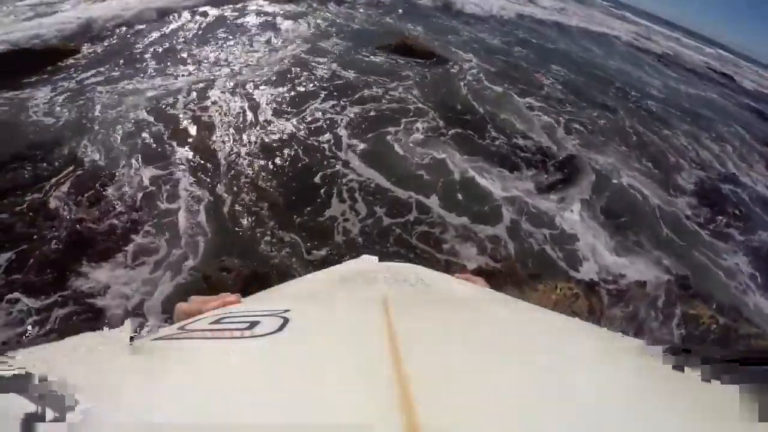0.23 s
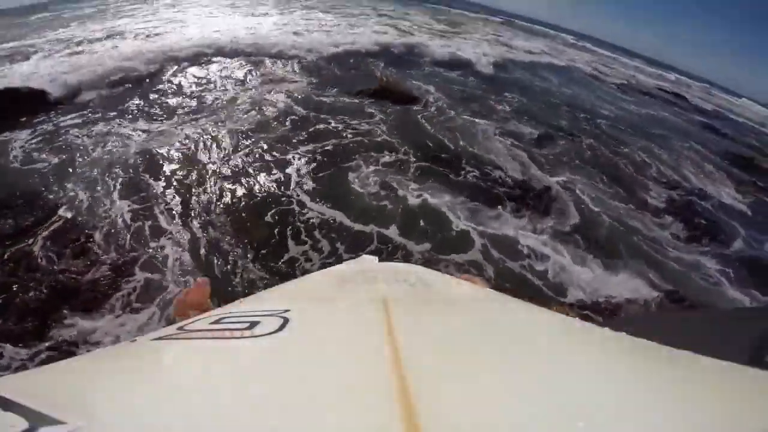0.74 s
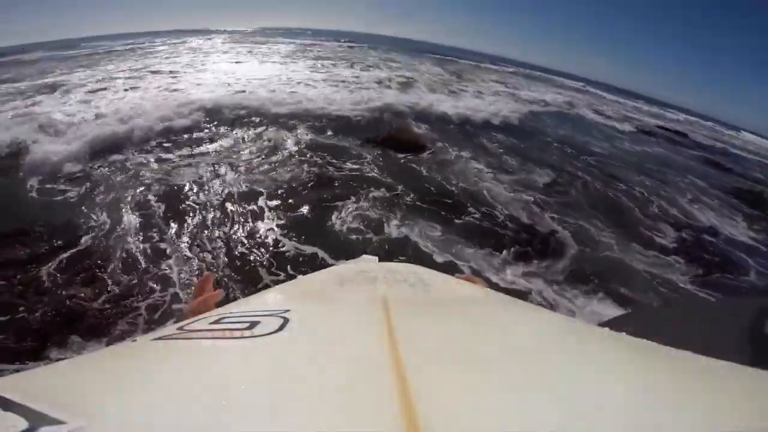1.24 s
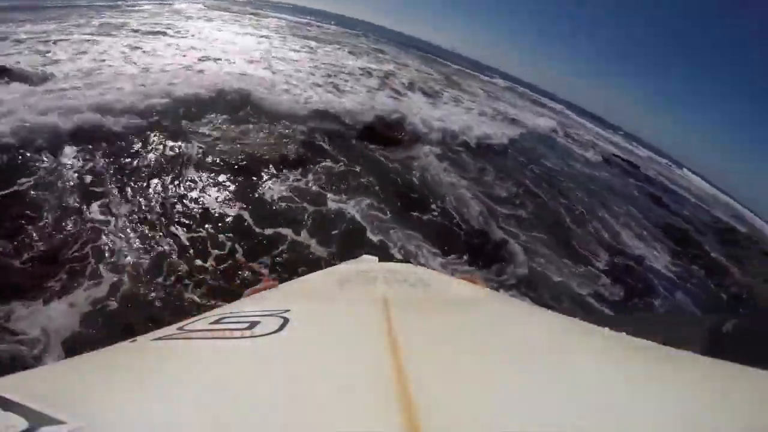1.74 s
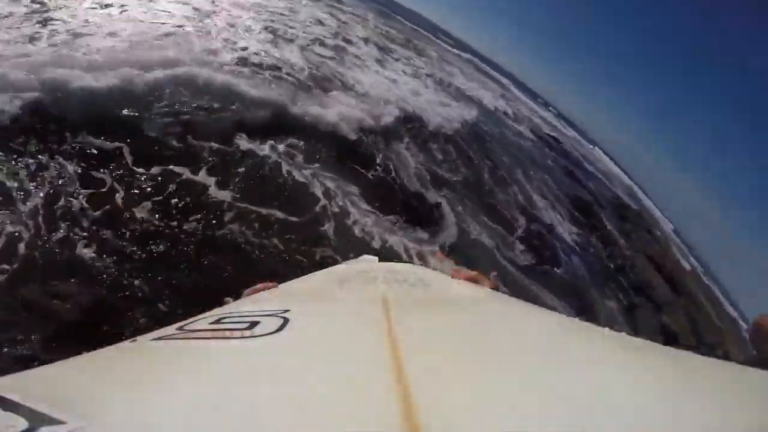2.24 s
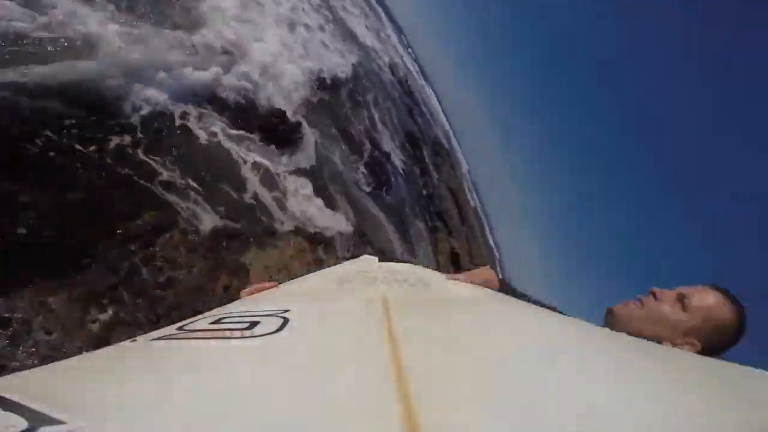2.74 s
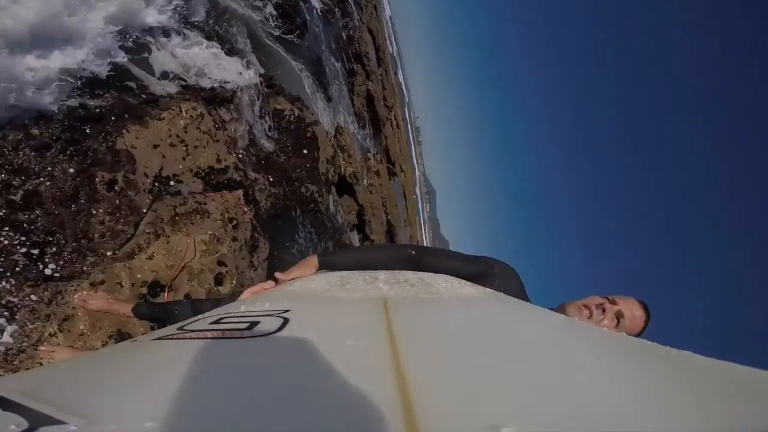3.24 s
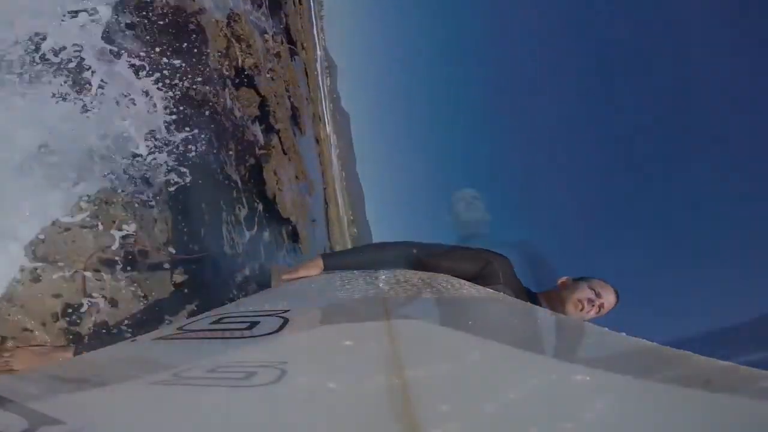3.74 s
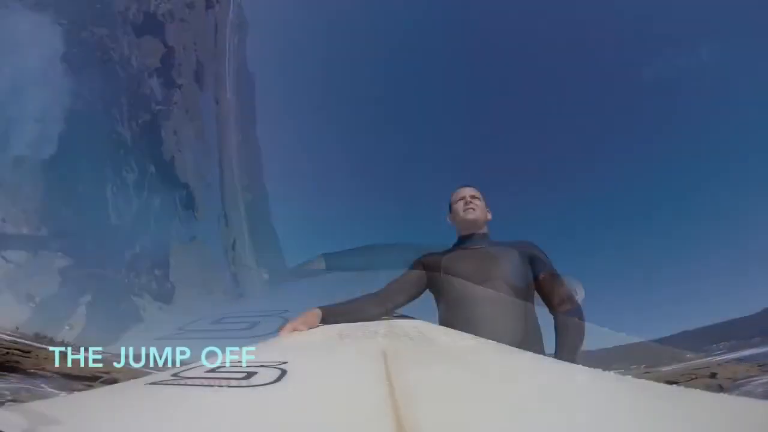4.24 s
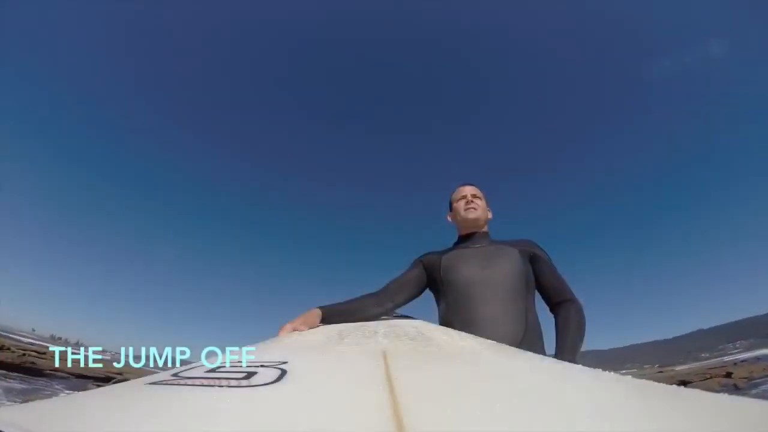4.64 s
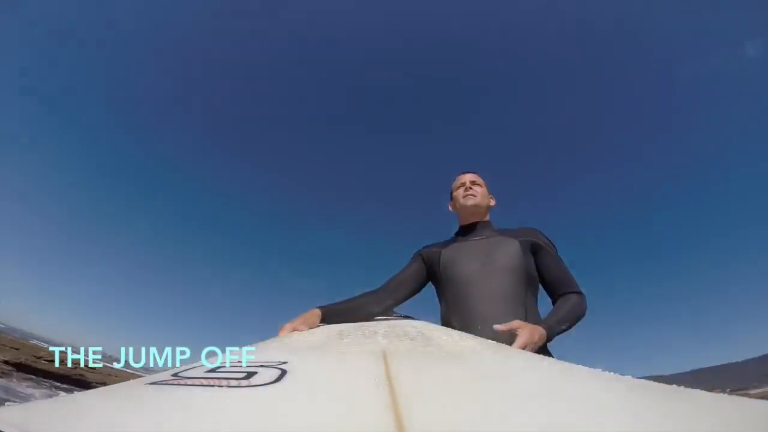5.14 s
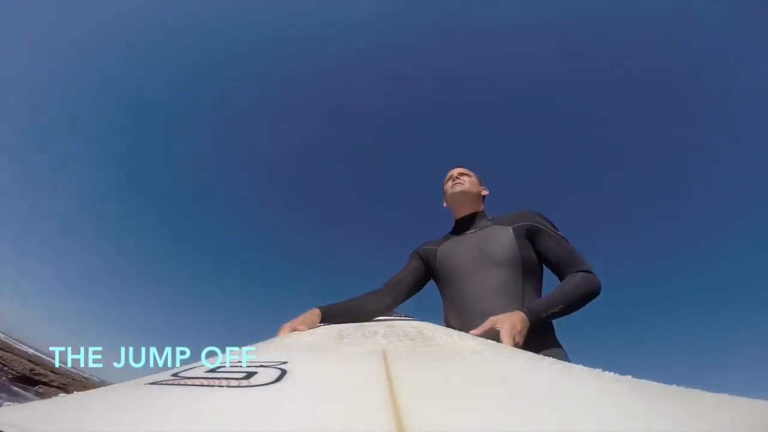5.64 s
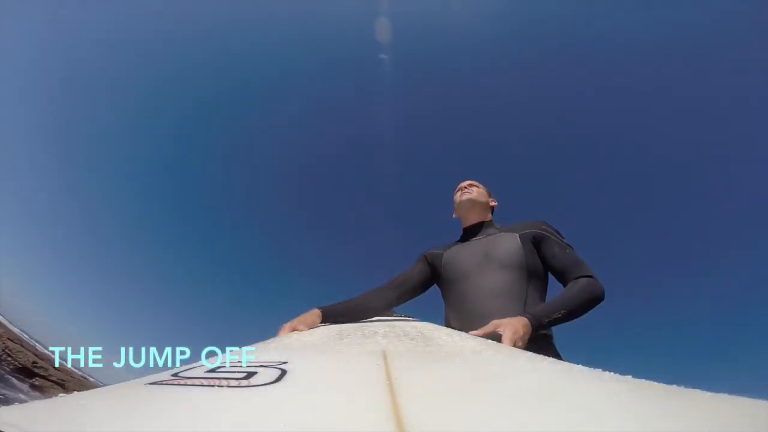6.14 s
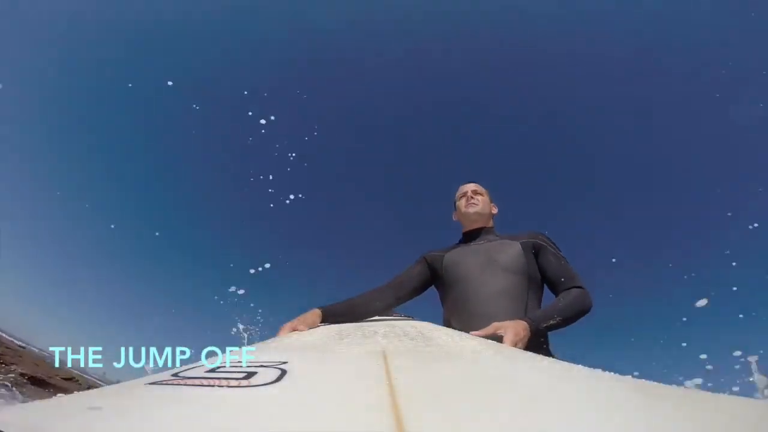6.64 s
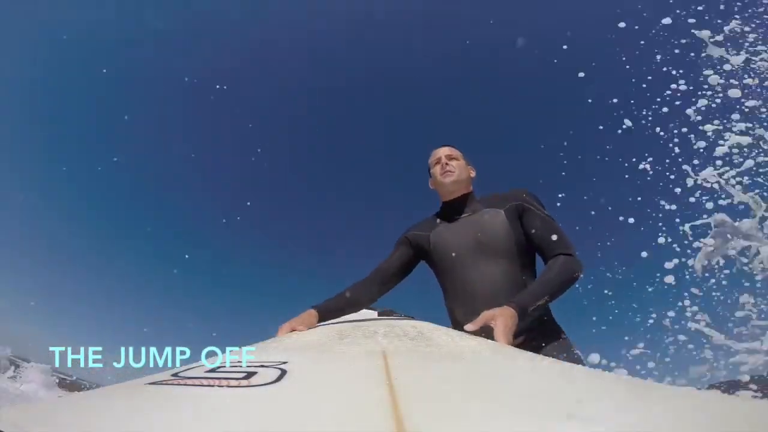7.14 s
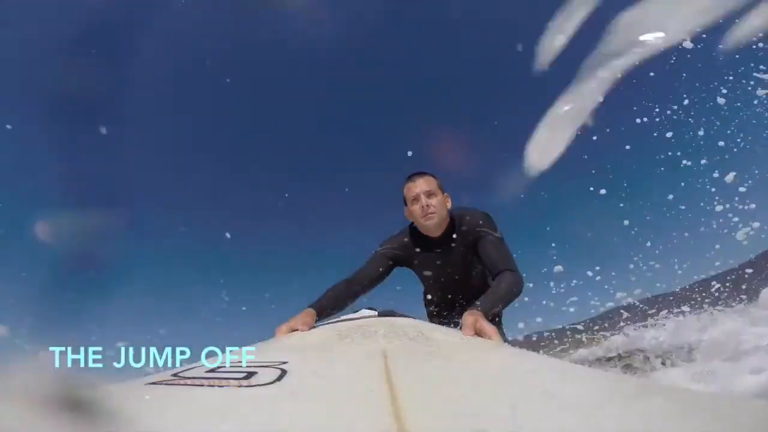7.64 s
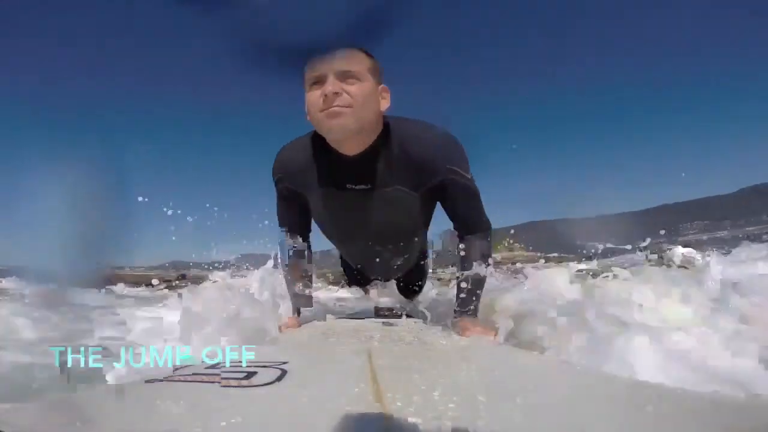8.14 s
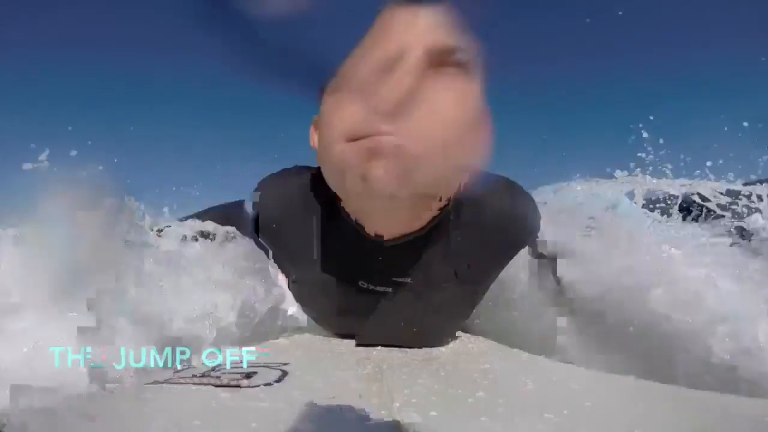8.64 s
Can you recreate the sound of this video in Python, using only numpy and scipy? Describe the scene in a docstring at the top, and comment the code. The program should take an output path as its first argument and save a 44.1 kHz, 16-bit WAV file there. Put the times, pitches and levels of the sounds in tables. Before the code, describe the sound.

Muffled knocks, deep board booms and wet squeaks over hissing surf, then a quieter stretch before waves splash, spatter and slap under the hull.

```python
"""On a rocky shore, a surfboard is carried into whitewater, heard from a sealed camera on its nose.
From the start surf hisses all around, as noise and bursting bubbles through the housing's resonances.
Hands and feet at arm's length jolt, knock, rub, squeak and skid; the board booms and rings as gliding tones.
After a cut to a second, quieter shot with the nose pointing up, the surf sings faintly. A wave bursts alongside:
spray crackles, drops spatter, a film of water dulls the treble; water slaps and bubbles under the booming hull."""
import sys
import numpy as np
from scipy import signal
from scipy.fft import rfft, irfft, next_fast_len
from scipy.io import wavfile
from scipy.ndimage import map_coordinates

SR = 44100
rng = np.random.default_rng(int(sys.argv[2]) if len(sys.argv) > 2 else 0)


def waveform_to_disk(signal):
    """Save audio, clipped to [-1, 1], as 16-bit WAV at the path in sys.argv[1]."""
    frames = np.transpose(np.atleast_2d(signal))
    scaled = np.clip(frames, -1, 1) * 32767
    samples = np.round(scaled).astype(np.int16)
    wavfile.write(sys.argv[1], SR, samples)


N = 392931
T = np.arange(N) / SR

# envelopes of hands, feet and water slaps (s), shared by the contacts and the board's answer to them
JOLT_RISE_S, KNOCK_BOOM_RISE_S, BOOM_T60_S = 0.015, 0.0063, 0.32
KNOCK_RISE_S, KNOCK_T60_S = 0.0016, 0.039
RUB_RISE_S, RUB_T60_S = 0.051, 0.11
# surge envelopes (s): the water itself, then the rise of the hull's boom
SURGE_RISE_S, SURGE_T60_S, HEAVE_RISE_S = 0.015, 0.25, 0.036

# soft jolts and, from 7.4 s, water slaps under the hull, that only bend the board, before trims:
# (t/s, peak level/dB, f/Hz)
JOLT_EVENTS = [(0.651, -29.5, 103.6), (1.633, -12.5, 113), (2.244, -11, 88.7), (2.453, -13.5, 108),
               (2.616, -12.5, 83.6), (2.654, -0.5, 104.5), (3.171, -12, 86.2), (3.975, -28, 114.7),
               (7.402, -29, 85), (7.921, -20.5, 84), (8.018, -17.5, 71.6), (8.643, -16, 96.3),
               (8.722, -19, 86.3)]
# hard knocks on the deck, before trims: (t/s, contact length/s, body level/dB, hollow core f/Hz,
# clatter level/dB, deck skin f/Hz, boom level/dB, boom f/Hz)
KNOCK_EVENTS = [(0, 0.017, -28, 668, -34.5, 1540, -16.5, 74),
                (0.09, 0.0091, -25, 272, -28, 1380, -10.5, 108.7),
                (.865, 0.025, -34, 300, -58, 1610, -21, 90),
                (1.838, 0.0094, -32.5, 310, -34.5, 1234, -11.5, 66.1),
                (1.919, 0.012, -19, 319, -34, 1600, -23, 103), (1.962, 0.003, -25, 380, -21, 1534, -26, 99),
                (1.975, 0.013, -16, 483, -23.5, 1460, -8, 100.5),
                (2.056, 0.0061, -20, 340, -24.5, 1676, -4, 45.6),
                (2.129, 0.0015, -12.5, 303, -22, 1475, -5.5, 53),
                (2.178, 0.0028, -12, 306, -18, 1505, -21.5, 93),
                (2.325, 0.0198, -14.5, 387.3, -20, 1510, -26, 89),
                (2.839, 0.0046, -44, 334, -32.5, 1850, -32, 104),
                (3.048, 0.0264, -28, 328, -32, 1750, -1.5, 49),
                (3.115, 0.0043, -29, 307, -31, 1630, -17, 86),
                (3.252, 0.012, -31.5, 285, -45.5, 1560, -14, 116.7),
                (3.336, 0.0023, -26.5, 298, -16.5, 1456, -1.5, 95.8),
                (3.771, 0.0017, -19.5, 312, -26.5, 1410, -15, 115.4),
                (5.308, 0.0054, -39.5, 326, -36.5, 1587, -27.5, 105),
                (8.37, 0.0036, -38, 256, -47, 1520, -13, 64.8), (8.53, 0.012, -45, 327, -45, 1900, -22, 95)]


def blows():
    """Everything that bends the board at a stroke: (t/s, peak level/dB, f/Hz, rise/s)."""
    jolts = [(s, db, hz, JOLT_RISE_S) for s, db, hz in JOLT_EVENTS]
    knocks = [(s, db, hz, KNOCK_BOOM_RISE_S) for s, *_, db, hz in KNOCK_EVENTS]
    return jolts + knocks


def bending(trim_db=-1, drift=0.1035, overtone_db=-17, overtone=2.7):
    """The board booms after each blow, its pitch wavering with the water's load."""
    boom, t = np.zeros(N), np.arange(SR // 2) / SR
    for s, db, hz, rise in blows():
        load = 1 + drift * map_coordinates(rng.standard_normal(32), [t * 40])  # 40 knots a second
        phase = 2 * np.pi * hz * np.cumsum(load) / SR
        ring = swell(t, rise, BOOM_T60_S) * np.sin(phase)
        ring += amp(overtone_db) * swell(t, rise, BOOM_T60_S / 2) * np.sin(overtone * phase)
        add(boom, s, amp(db + trim_db) * ring)
    return boom


def hollow(hollow_db=-1.5, upper_db=-10, upper=1.7, deck_db=2, hollow_t60=0.1, deck_t60=0.055,
           hollow_rough=0.16, deck_rough=0.059, sag_octaves_per_s=8):
    """Each knock rings the sagging hollow core and the steadier, stiff skin of the deck."""
    out, t = np.zeros(N), np.arange(SR // 4) / SR
    for s, length, low_db, core_hz, mid_db, skin_hz, *_ in KNOCK_EVENTS:
        pitch = core_hz * 2 ** (-sag_octaves_per_s * (t - length))  # passes core_hz as the contact ends
        core = amp(hollow_db) * rasp(pitch, hollow_rough)
        core += amp(upper_db) * rasp(upper * pitch, hollow_rough)
        skin = amp(deck_db) * rasp(np.full(len(t), float(skin_hz)), deck_rough)
        add(out, s, amp(low_db) * core * stroke(t, length, KNOCK_RISE_S, hollow_t60))
        add(out, s, amp(mid_db) * skin * stroke(t, length, KNOCK_RISE_S, deck_t60))
    return out


# modes of the nose under the microphone: (f/Hz, level/dB relative to the bump, t60/s)
NOSE_MODES = [(191.4, 12, 0.25), (369, 7.5, 0.16), (509, -6.5, 0.066), (699, -19, 0.14), (1222, -1, 0.065)]


def nose(bump_s=2.325, bump_db=-18.5, rise=0.0059):
    """One bump, at 2.325 s, rings the nose in its own modes."""
    out, t = np.zeros(N), np.arange(SR // 2) / SR
    for hz, db, t60 in NOSE_MODES:
        add(out, bump_s, amp(bump_db + db) * swell(t, rise, t60) * np.sin(2 * np.pi * hz * t))
    return out


# hands rubbing along the deck, before trims: (t/s, length/s, level/dB)
RUB_EVENTS = [(0, 0.13, -44), (0.736, 0.21, -37.5), (1.55, 0.095, -29), (1.68, 0.11, -36.5),
              (2.085, 0.071, -29.5), (2.614, 0.11, -29.5), (2.955, 0.11, -34.5), (3.217, 0.21, -37.5)]


def handling(flex, body_db=-17, clatter_db=-12, fizz_db=-38, chatter_db=4, heel_hz=620, deck_hz=1550,
             deck_q=1.8, shudder_db=-22.5, shudder_t60=0.38):
    """Soft, gritty contacts scuff the deck and chatter in step with the bending board."""
    (body, clatter), t = np.zeros((2, N)), np.arange(SR // 3) / SR
    for s, length, low_db, _, mid_db, *_ in KNOCK_EVENTS:
        contact = stroke(t, length, KNOCK_RISE_S, KNOCK_T60_S)
        contact += amp(shudder_db) * swell(t, KNOCK_RISE_S, shudder_t60)  # the wet deck shudders on
        add(body, s, amp(low_db + body_db) * contact)
        add(clatter, s, amp(mid_db) * contact)
    for s, length, db in RUB_EVENTS:
        contact = amp(db) * stroke(t, length, RUB_RISE_S, RUB_T60_S)
        add(body, s, amp(body_db) * contact)
        add(clatter, s, contact)
    flex_phase = np.angle(signal.hilbert(flex, next_fast_len(N))[:N])
    pressure = amp(chatter_db * np.cos(flex_phase))
    grit = unit(pressure * patter(rate=12000, spread_db=1))
    return np.array([body * soften(grit, heel_hz),
                     amp(clatter_db) * clatter * resonate(grit, deck_hz, deck_q),
                     amp(fizz_db) * clatter * grit])


# wet skin squeaking on the deck, before flutter:
# (t/s, length/s, f/Hz at the start, glide/octaves, level/dB, roughness 0-1)
SQUEAK_EVENTS = [(0.027, 0.093, 1110, 0.13, -37, 0.07), (2.625, 0.14, 1133, -0.028, -32.5, 0.06),
                 (2.685, 0.055, 1570, 0.0088, -42, 0.01), (3.114, 0.033, 994, -0.15, -27.5, 0.12),
                 (3.134, 0.03, 1072, 0.313, -31, .06), (3.158, 0.046, 986, 0.262, -30.5, 0.13),
                 (3.211, 0.026, 1127, -0.029, -33, 0.06), (8.532, 0.019, 1150, 0.038, -32.5, 0.1)]


def squeaks(octave_db=-5, flutter_db=-4.5):
    """Wet skin sticks and slips at an unsteady, gliding rate."""
    out = np.zeros(N)
    for s, length, hz, glide, db, rough in SQUEAK_EVENTS:
        window = signal.windows.tukey(max(int(length * SR), 2))
        pitch = hz * 2 ** np.linspace(0, glide, len(window))
        tone = rasp(pitch, rough) + amp(octave_db) * rasp(2 * pitch, rough)
        add(out, s, amp(db) * window * tone)
    return out * amp(flutter_db * wobble(190))


# a wet grip skidding along the rail, before flutter: (t/s, f/Hz, level/dB)
SKID_CURVE = [(1.543, 1650, -36), (1.577, 1566, -27), (1.599, 1339, -23), (1.612, 1603, -23),
              (1.628, 1710, -34), (1.645, 1730, -47)]


def skid(rough=.08, upper=1.62, upper_db=-4, groan_hz=418, groan_db=-2, flutter_db=3):
    """A wet grip skids on the rail: its squeal dips and climbs again over a rough, level groan."""
    pitch, db = curves(SKID_CURVE)
    squeal = rasp(pitch, rough) + amp(upper_db) * rasp(upper * pitch, rough)
    groan = amp(groan_db) * rasp(np.full(N, float(groan_hz)), 2 * rough)
    sliding = (T > SKID_CURVE[0][0]) * (T < SKID_CURVE[-1][0])
    return sliding * amp(db + flutter_db * wobble(250)) * (squeal + groan)


# surges of whitewater on the rocks and against the board, before trims:
# (t/s, length/s, gurgle level/dB, splash level/dB, boom level/dB, spray level/dB)
SURGES = [(3.253, .1, -39, -37, -52, -56), (6.386, 0.27, -47.5, -45.5, -71, -86),
          (6.61, 0.013, -28, -28.5, -30.5, -67), (6.676, 0.072, -42, -37, -36, -60.5),
          (6.977, 0.015, -47, -48, -34, -67), (7.039, 0.064, -52, -41, -31, -56.5),
          (7.393, 0.058, -42.5, -41.5, -39.5, -60), (7.473, 0.22, -34, -38.5, -26.5, -56),
          (7.683, 0.088, -40, -51, -26.5, -60.5), (7.868, 0.26, -43.5, -46, -31.5, -70.5),
          (8.212, 0.15, -52, -47.5, -33.5, -66.5), (8.521, 0.064, -43, -44, -25, -65),
          (8.586, 0.062, -32, -41, -27, -77), (8.697, 0.15, -46.5, -45.5, -50, -79)]


def splash(body_db=-14, splash_db=-3.0, foam_db=-16, clump_db=2.1, foam_hz=5500, mist_hz=6500, slosh_hz=330):
    """Each surge is a clumpy cloud of droplets and bubbles over hissing foam, with gritty spray."""
    power, t = np.zeros((4, N)), np.arange(SR) / SR
    for s, length, low_db, mid_db, _, spray_db in SURGES:
        surge = stroke(t, length, SURGE_RISE_S, SURGE_T60_S)
        levels = (low_db + body_db, mid_db + splash_db, mid_db + foam_db, spray_db)
        for track, db in zip(power, levels):
            add(track, s, (amp(db) * surge) ** 2)
    body, clatter, hiss, thrown = np.sqrt(power)
    clumps = unit(amp(clump_db * wobble(90)))
    droplets = crackle(rate=900, spread_db=2.3, t60=.007)
    air_pockets = bubbles(rate=220, hz=194.8, cycles=5, spread_db=0.0)
    air_pockets += bubbles(rate=350, hz=678, cycles=5, spread_db=3.5)
    gurgle = unit(air_pockets + soften(rng.standard_normal(N), slosh_hz))
    small_bubbles = bubbles(rate=1000, hz=2080, cycles=5, spread_db=1)
    froth = unit(droplets + .5 * rng.standard_normal(N) + .5 * small_bubbles)
    foam = amp(film_db()) * soften(rng.standard_normal(N), foam_hz)
    mist = soften(droplets + 2 * crackle(rate=500, spread_db=4, t60=.004), mist_hz)
    return np.array([body * clumps * gurgle,
                     clatter * clumps * froth,
                     hiss * foam + thrown * clumps * mist])


def heaving(trim_db=-1, hull_hz=106.7, drift=0.09, t60=0.35):
    """Each surge keeps the hull booming, unsteady in pitch as the water's load shifts."""
    power, t = np.zeros(N), np.arange(SR) / SR
    for s, length, _, _, db, _ in SURGES:
        add(power, s, (amp(db + trim_db) * stroke(t, length, HEAVE_RISE_S, t60)) ** 2)
    phase = 2 * np.pi * hull_hz * np.cumsum(1 + drift * wobble(60)) / SR
    return np.sqrt(power) * unit(np.sin(phase))


# the largest drops landing on the housing, before trims: (t/s, peak level/dB, f/Hz, fizz level/dB)
DROP_EVENTS = [(0.813, -21, 2410, -52), (6.613, -18, 1600, -59), (6.6308, -10, 2050, -54),
               (6.6425, -17.5, 1500, -53), (6.667, -10.5, 3050, -37.5), (6.7354, -20, 2610, -62),
               (6.8485, -28.5, 1600, -69), (7.0465, -22, 2900, -53), (7.4965, -19.5, 2300, -40),
               (7.5135, -20, 2100, -40), (7.541, -18, 2200, -37), (7.56, -13.5, 2620, -40),
               (7.5845, -16, 1810, -42), (7.6122, -17.5, 2700, -29), (7.637, -15.5, 1900, -41),
               (7.666, -13, 2300, -41), (7.745, -23, 2500, -45), (7.763, -27.5, 1770, -51),
               (7.8, -31, 1680, -55), (7.837, -30, 2380, -51)]


def drops(tick_db=-11, fizz_db=5.0, t60=0.019, hold_s=0.00044, wet_hz=45000, q=0.88):
    """Each drop flattens on the housing and spatters for a few milliseconds, hard ones brighter."""
    force, t = np.zeros((3, N)), np.arange(SR // 20) / SR
    for s, db, hz, bright_db in DROP_EVENTS:
        spatter = stroke(t, hold_s, 0.00045, t60)
        tick = resonate(rng.standard_normal(len(t)), hz, q)
        fizz = soften(rng.standard_normal(len(t)), wet_hz * amp(bright_db / 2))  # more fizz, higher cutoff
        add(force[1], s, amp(db + tick_db) * spatter * tick)
        add(force[2], s, amp(bright_db + fizz_db) * spatter * fizz)
    return force


# large bubbles in the churn beside the nose: (t/s, f/Hz at the start, level/dB)
PLINK_EVENTS = [(7.882, 1620, -31), (7.901, 1555, -29), (7.917, 1496, -33), (8.613, 1790, -36),
                (8.656, 1480, -31), (8.825, 1500, -36.5)]


def plinks(rise=0.0023, t60=0.044, climb_per_s=3.4, rough=0.034):
    """Single large bubbles ring briefly, rising in pitch."""
    out, t = np.zeros(N), np.arange(SR // 12) / SR
    for s, hz, db in PLINK_EVENTS:
        add(out, s, amp(db) * swell(t, rise, t60) * rasp(hz * (1 + climb_per_s * t), rough))
    return out


# sheets of water on the housing, treble lost before draining: (t/s, loss level/dB, drain time constant/s)
WATER_SHEETS = [(6.7, 9, 0.64), (7.66, 9.005, 7)]


def film_db(spread_s=0.034):
    """Each sheet of water spreads over the housing, dulls the fizz and drains exponentially (dB)."""
    loss = 0
    for s, db, drain in WATER_SHEETS:
        spread = np.clip((T - s) / spread_s, 0, 1)
        loss = loss + db * spread * np.exp(-np.maximum(T - s, 0) / drain)
    return -loss


# level of the surf as heard, with its dips after loud splashes, before churn and trims: (t/s, level/dB)
SURF_LEVEL = [(0, -33.5), (.15, -40.5), (.5, -38), (1.43, -36.5), (2.2, -34), (2.42, -36), (3.2, -33),
              (4.1, -38), (4.36, -50), (5.0, -49), (6.3, -43.5), (6.64, -42.5), (6.87, -53.5),
              (7.33, -44.5), (7.6, -43.5), (7.82, -54.5), (8.45, -49.5), (8.9, -46.5)]
SECOND_SHOT_S = 4.25  # when the second shot begins, with the nose pointing up


def surf(body_db=-12.0, wash_db=-8.0, fizz_db=-18.5, second_fizz_db=0.5, churn_db=1.1, grain=0.46, air_hz=8500):
    """Foam all around: countless bursting bubbles merge into a churning wash, dulled by distance."""
    level = curves(SURF_LEVEL)[0] + churn_db * wobble(12)
    fizz_trim = fizz_db + film_db() + second_fizz_db * (T > SECOND_SHOT_S)
    layers = []
    for trim in (body_db, wash_db, fizz_trim):
        bursts = grain * patter(rate=1500, spread_db=5.5)
        foam = soften(rng.standard_normal(N) + bursts, air_hz)
        layers.append(amp(level + trim) * foam)
    return np.array(layers)


# narrow housing resonances in the second shot: (f/Hz, width/Hz, level/dB relative to the surf)
SINGING_MODES = [(3110, 250, -20.5), (3700, 220, -25.5), (6170, 570, -30.5)]


def singing():
    """In the second shot, the surf sings faintly in a few narrow resonances of the housing."""
    level = amp(curves(SURF_LEVEL)[0]) * np.clip((T - SECOND_SHOT_S) * 10, 0, 1)
    size = next_fast_len(N)
    f = np.fft.rfftfreq(size, 1 / SR)
    noise = rfft(rng.standard_normal(size))
    song = np.zeros(N)
    for hz, width, db in SINGING_MODES:
        song += amp(db) * unit(irfft(noise * peaks(f, [(hz, width, 0)]), size)[:N])
    return level * song


# spectrum of the trembling hull, relative: (f/Hz, level/dB per Hz)
HULL_SPECTRUM = [(13, -55), (22, 0.5), (64, -2), (103, 1.5), (129, 1), (157, -27.5), (189, -6), (216, -88),
                 (260, -13.5), (340, -75)]


def trembling(surf_db=-7, blow_db=-19, rub_db=3, surge_db=-6, t60=0.79):
    """The whole board trembles as low noise with the surf, and with every blow, rub and surge."""
    power, t = amp(curves(SURF_LEVEL)[0] + surf_db) ** 2, np.arange(SR) / SR
    for s, db, _, rise in blows():
        add(power, s, (amp(db + blow_db) * swell(t, rise, t60)) ** 2)
    for s, length, db in RUB_EVENTS:
        add(power, s, (amp(db + rub_db) * stroke(t, length, RUB_RISE_S, RUB_T60_S)) ** 2)
    for s, length, _, _, db, _ in SURGES:
        add(power, s, (amp(db + surge_db) * stroke(t, length, HEAVE_RISE_S, t60)) ** 2)
    size = next_fast_len(N)
    hz, db = np.transpose(HULL_SPECTRUM)
    log_f = np.log(np.fft.rfftfreq(size, 1 / SR) + 1)
    colour = amp(np.interp(log_f, np.log(hz), db, right=-120))
    rumble = irfft(rfft(rng.standard_normal(size)) * colour, size)[:N]
    return np.sqrt(power) * unit(rumble)


def patter(rate, spread_db):
    """Tiny impacts of very unequal size, rate a second, at rms 1."""
    count = int(rate * N / SR)
    size = amp(spread_db * np.minimum(rng.exponential(size=count), 4)) * rng.choice([-1, 1], count)
    return unit(np.bincount(rng.integers(0, N, count), size, N))


def crackle(rate, spread_db, t60):
    """Droplets that each spatter for an instant, rate a second, at rms 1."""
    decay = amp(-60 * np.arange(SR // 20) / SR / t60)
    power = signal.fftconvolve(patter(rate, spread_db) ** 2, decay ** 2)[:N]
    return unit(np.sqrt(abs(power)) * rng.standard_normal(N))


def bubbles(rate, hz, cycles, spread_db):
    """Short pings that rise in pitch as each bubble nears the surface, at rms 1."""
    count = int(rate * N / SR)
    t = np.arange(int(SR * min(6 * cycles / hz, .12))) / SR
    pitch = np.minimum(hz * np.exp(0.446 * rng.standard_normal((count, 1))), SR / 8)
    age = t * pitch / cycles
    size = amp(spread_db * np.minimum(rng.exponential(size=(count, 1)), 3))
    tone = np.sin(2 * np.pi * pitch * t * (1 + 0.026 * np.minimum(age, 5)))
    pings = size * np.exp(-age) * (1 - t / t[-1]) * tone
    at = rng.integers(0, N, (count, 1)) + np.arange(len(t))
    return unit(np.bincount(at.ravel(), pings.ravel(), N)[:N])


def rasp(pitch, rough):
    """A tone on a pitch curve, blurred by an uneven slipping rate."""
    knots = rng.standard_normal(len(pitch) // 64 + 4)
    jitter = map_coordinates(knots, [np.arange(len(pitch)) / 64])
    return np.sin(2 * np.pi * np.cumsum(pitch * (1 + rough * jitter)) / SR)


def soften(x, hz):
    """A cushioned contact: x loses its treble above hz, and comes back at rms 1."""
    return unit(signal.sosfilt(signal.butter(2, min(hz, SR / 3), fs=SR, output="sos"), x))


def resonate(x, hz, q):
    """x coloured by one broad resonance (q at least 1), at rms 1."""
    return unit(signal.lfilter(*signal.iirpeak(hz, max(q, 1), fs=SR), x))


def swell(t, rise, t60):
    """An envelope that climbs to 1 and then dies away."""
    climb = np.sin(np.pi / 2 * np.minimum(t / rise, 1)) ** 2
    return climb * np.exp(-np.log(1000) * np.maximum(t - rise, 0) / t60)


def stroke(t, length, rise, t60):
    """An envelope that climbs over rise and decays once length has passed, even if still climbing."""
    climb = np.sin(np.pi / 2 * np.minimum(t / rise, 1)) ** 2
    return climb * np.exp(-np.log(1000) * np.maximum(t - length, 0) / t60)


def amp(db):
    """Decibels to gain."""
    return 10 ** (np.asarray(db) / 20)


def unit(x):
    """x at rms 1."""
    return x / np.sqrt(np.mean(x ** 2) + 1e-20)


def curves(rows):
    """One value per sample for each column after the time."""
    s, *cols = np.transpose(rows)
    return [np.interp(T, s, c) for c in cols]


def wobble(rate):
    """A smooth random curve, rate knots a second."""
    return map_coordinates(rng.standard_normal(int(N * rate / SR) + 4), [T * rate])


def add(track, s, sound):
    """Mix a sound into a track at time s."""
    start = int(np.clip(round(s * SR), 0, N - 1))
    track[start:start + len(sound)] += sound[:N - start]


def peaks(f, modes):
    """Gain at each frequency of steep-sided resonances (f/Hz, width/Hz, level/dB)."""
    gains = [amp(db) / (1 + (2 * (f - hz) / width) ** 2) for hz, width, db in modes]
    return np.sqrt(sum(gain ** 2 for gain in gains))


# resonances of the housing and deck around the microphone: (f/Hz, width/Hz, relative level/dB)
HOUSING_MODES = [(315.3, 162, 8.5), (616, 376, 0.5), (967, 330, -6.5), (1180, 38, 2.5), (1584, 550, 6.5),
                 (2160, 420, 2.5), (2478, 470, 2), (3016, 580, -1), (3610, 320, -7.5), (4576, 1970, -8),
                 (5740, 900, -9), (7034, 1500, -12), (9990, 1320, -18.5), (13300, 12500, -16.5)]
# body, clatter and fizz ranges: (lowest f/Hz, highest f/Hz)
FORCE_BANDS = [(150, 1020), (1100, 3750), (4250, 15500)]


def housing(force, band):
    """A force ringing through the housing's resonances in one range; white noise keeps its level."""
    size = 2 * next_fast_len(N // 2 + SR // 4)
    f = np.fft.rfftfreq(size, 1 / SR)
    # minimum phase, so that the ringing follows the force
    cepstrum = irfft(np.log(peaks(f, HOUSING_MODES) + 1e-6))
    causal = np.exp(rfft(2 * cepstrum[:size // 2], size) - cepstrum[0])
    b, a = signal.butter(6, band, "bandpass", analog=True)
    response = causal * signal.freqs(b, a, f)[1]
    response /= np.sqrt(np.mean(abs(response) ** 2))
    return irfft(rfft(force, size) * response, size)[:N]


def scene():
    """Water and contacts pass through the housing; the board's boom and ring come straight up the mount."""
    flex = bending() + nose() + heaving() + trembling()
    forces = handling(flex) + splash() + drops() + surf()
    rings = hollow() + squeaks() + skid() + plinks() + singing()
    housed = sum(housing(force, band) for force, band in zip(forces, FORCE_BANDS))
    return (flex + rings + housed)[None]


def record(dry, top_hz=15500):
    """The camera's microphone rounds off the highest peaks and keeps nothing above its band limit."""
    held = dry / (1 + abs(dry / .95) ** 8) ** (1 / 8)
    size = next_fast_len(N + SR // 2)
    passed = np.fft.rfftfreq(size, 1 / SR) < top_hz
    return irfft(rfft(held, size) * passed, size)[:, :N]


dry = scene()
out = record(dry)
waveform_to_disk(out)
```